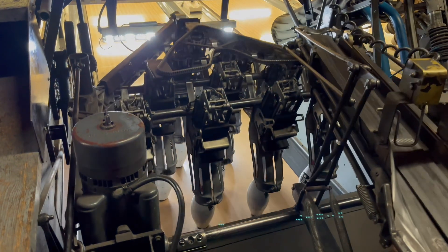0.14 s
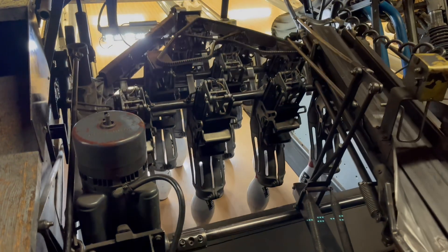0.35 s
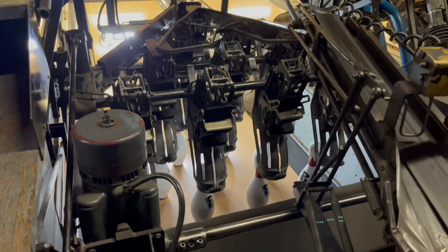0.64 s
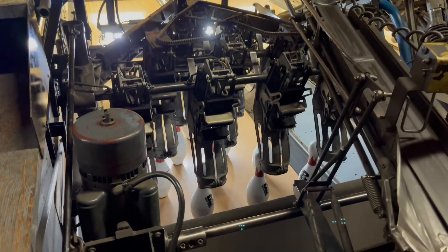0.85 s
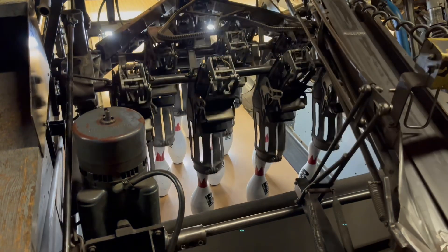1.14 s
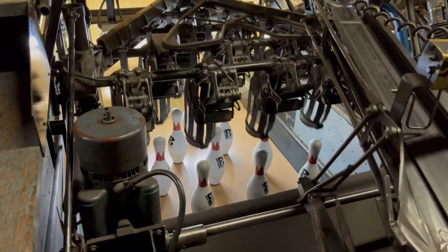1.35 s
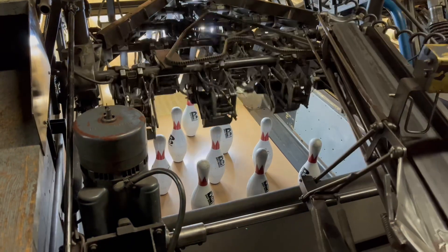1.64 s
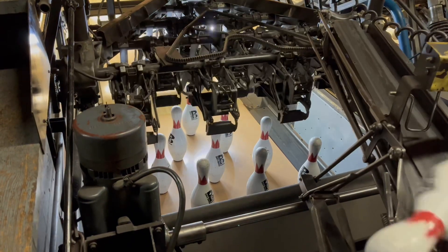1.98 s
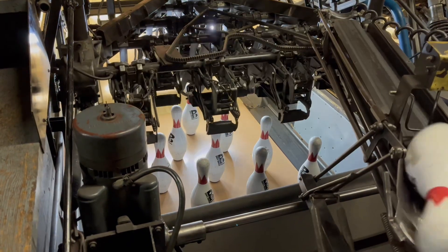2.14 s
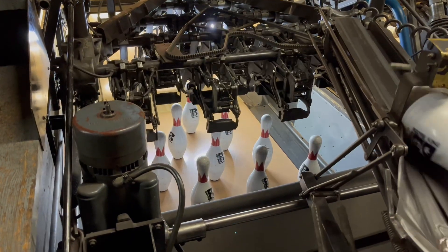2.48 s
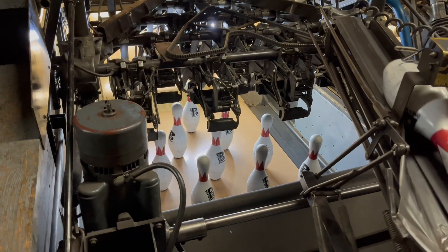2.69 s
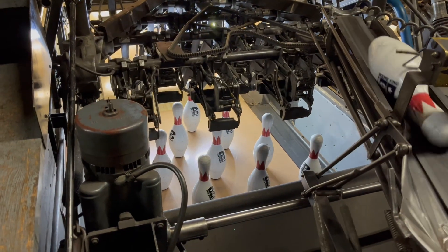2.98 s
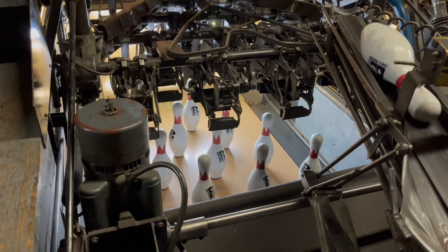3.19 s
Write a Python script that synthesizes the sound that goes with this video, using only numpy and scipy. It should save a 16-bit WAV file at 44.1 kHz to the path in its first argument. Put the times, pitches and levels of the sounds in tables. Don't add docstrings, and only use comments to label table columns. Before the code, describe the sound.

Pinsetter from behind: bright metal clacks first, a quieter whirring stretch, then dense hollow pin knocks, a heavy frame boom and short belt squeaks, heard close in stereo with a short dull room echo.

```python
import sys
import numpy as np
from scipy import signal
from scipy.fft import rfft, irfft, next_fast_len
from scipy.io import wavfile

SR = 44100
rng = np.random.default_rng(int(sys.argv[2]) if len(sys.argv) > 2 else 0)


def output_pcm(signal):
    pcm = np.clip(np.atleast_2d(signal).T, -1, 1) * 32767
    wavfile.write(sys.argv[1], SR, np.round(pcm).astype(np.int16))


def ratio(d):
    e = np.asarray(d, float) / 20
    return 10 ** e


N = 146412


def in_time(rows):
    s, *columns = np.transpose(rows)
    return [np.interp(np.arange(N) / SR, s, c) for c in columns]


def at_hz(points, hz):
    f, v = np.transpose(points)
    return np.interp(np.log(hz + 1), np.log(f + 1), v)


def rms_one(x):
    return x / np.sqrt(np.mean(x ** 2) + 1e-20)


def drift(rate_hz):
    r = np.exp(-80 * np.pi * rate_hz / SR)
    slow = signal.lfilter([1], [1, -2 * r, r * r], rng.standard_normal(N // 40 + 2002))[2000:]
    return np.interp(np.arange(N) / 40, np.arange(len(slow)), rms_one(slow))


def tone(hz):
    return np.sin(2 * np.pi * np.cumsum(hz) / SR)


def swell(s, length_s):
    return np.sin(np.pi * np.clip((np.arange(N) / SR - s) / length_s, 0, 1)) ** 2


def ring(x, hz, t60):
    r, w = ratio(-60 / (t60 * SR)), 2 * np.pi * hz / SR
    return signal.lfilter([0, np.sin(w)], [1, -2 * r * np.cos(w), r * r], x + 1e-18)


def band(x, low_hz, high_hz):
    return signal.sosfilt(signal.butter(2, [low_hz, high_hz], "band", fs=SR, output="sos"), x)


def blows(rows, body, body_db, t60, tail_t60, low_hz, high_hz, damping):
    contact_s, crack_db, crack_t60 = 0.0029, -5, 0.015
    out, shake = np.zeros(N + SR), np.zeros(N + SR)
    t = np.arange(SR // 4) / SR
    spread = rng.normal(0, 1, (50, len(body)))
    for (s, db, hz, rattle_db), chance in zip(rows, spread):
        own = np.sin(2 * np.pi * hz * t) * ratio(-60 * t / t60 * (hz / 1000) ** damping)
        for (f, level_db, decay), c in zip(body, chance):
            mode = np.sin(2 * np.pi * f * (1 + 0.028 * c) * t + c)
            own = own + ratio(body_db + level_db + 2.1 * c) * mode * ratio(-60 * t / decay)
        i = int(s * SR)
        out[i:i + len(t)] += ratio(db + 0.5) * own * (1 - np.exp(-t * hz * 2.3))
        rattle = ratio(db + rattle_db - 1.5 - 60 * t / tail_t60)
        crack = ratio(db + crack_db + 0.5 - 60 * t / crack_t60)
        shake[i:i + len(t)] += (1 - np.exp(-t / contact_s)) * (rattle + crack)
    flutter = ratio(3.96 * drift(104.0))
    loose = rms_one(band(rng.standard_normal(N), low_hz, high_hz))
    return out[:N] + shake[:N] * flutter * loose


# [t/s, peak level/dB, f/Hz, rattle level/dB]
LATCH_STRIKES = [(0.1942, -1, 3920, -17), (0.2187, -3, 3300, -13), (0.3215, -9.5, 1713, -8),
                 (0.3503, -14.5, 2930, -7.5), (1.3763, -6.5, 3545, -13), (1.5924, -15, 4780, 1.5),
                 (1.7404, 0, 4220, -16), (2.0542, -15, 1910, -33), (2.1258, -15.5, 1680, -5),
                 (2.2698, -26.5, 1950, 10.5), (2.4612, -26.5, 1880, 5.5), (2.7685, -42, 1600, -14.5),
                 (3.0306, -35, 2090, 4), (3.1789, -10, 1715, -13.5), (.1855, -23, 4200, -9),
                 (.1945, -18, 2380, -22), (.208, -13, 4800, -9), (.2245, -9, 3260, -19),
                 (.5861, -27.5, 1680, 0.5), (1.1348, -17, 3710, -18), (1.379, -5, 4570, -24),
                 (1.3795, -28, 2360, -19), (1.383, -9, 4730, -21), (1.7425, -11, 4550, -20),
                 (2.6384, -20, 1490, -13), (2.487, -27, 2500, 3), (2.29, -26.5, 2490, 6.5),
                 (.196, -8.5, 4790, -24), (2.77, -23.5, 4270, -3.5), (1.3775, -8, 2990, -16)]
# [f/Hz, level/dB, t60/s]
STEEL_MODES = [(822, -15, 0.068), (1040, -11.5, 0.092), (1345, -12, 0.12), (2436, -7, 0.026),
               (3080, -17.5, 0.051), (4190, -2, 0.012), (4680, -34, 0.072), (6900, -22, 0.01),]


def latches():
    return blows(LATCH_STRIKES, STEEL_MODES, body_db=-7.5, t60=0.06, tail_t60=0.065,
                 low_hz=1300, high_hz=9000, damping=1.0)


# [t/s, peak level/dB, f/Hz, rattle level/dB]
PIN_HITS = [(0.221, -18.5, 984, -0.5), (0.453, -20.5, 444, -2), (0.477, -15, 804, -33),
            (0.498, -12.5, 378, -27), (0.529, -23, 760, -11), (1.237, -27.5, 527, 7.5),
            (1.315, -14.5, 778, -26), (1.377, -13.5, 940, 1), (1.419, -9.5, 790, -15),
            (1.514, -6, 600, -19), (1.561, -6.5, 600, -21), (1.74, -11, 585, -13), (1.758, -10, 484, -22),
            (1.97, -26, 247, 6.5), (2.058, -6, 1040, -2.5), (2.107, -7.5, 287, -5.5),
            (2.129, -4.5, 520, -11), (2.265, -5, 900, -10.5), (2.414, -16, 295, -28), (2.461, 1, 338, -28),
            (2.487, -0.5, 820, -30), (2.532, -14, 290, -43), (2.647, -15, 1100, -4),
            (2.765, -3.5, 345, -13.5), (3.009, -14, 844, -28), (3.177, -10.5, 1070, -2.5),
            (.224, -19.5, 815, -27), (.229, -25.5, 1440, -20), (1.381, -17, 434, -21),
            (1.392, -7, 404, -24), (1.523, -6.5, 750, -25), (1.543, -21, 700, 1), (1.555, -38, 735, -23),
            (1.571, -9.5, 530, -21), (2.12, -8.5, 700, -18), (2.225, -19, 624, -17), (2.535, -17, 800, -8),
            (3.035, -14, 840, -19), (3.1, -14, 810, -11), (2.56, -15.5, 795, -17), (2.6, -14, 690, -15),
            (2.675, -9, 764, -23), (.233, -16, 1030, -20)]
# [f/Hz, level/dB, t60/s]
PIN_MODES = [(265, -4.5, 0.075), (411, -4, 0.062), (543, 5, 0.025), (717, -6.5, 0.082), (835, 11, 0.0067),
             (980, -10, 0.067), (1235, -1.5, 0.017), (1647, -14, 0.0087)]


def pins():
    return blows(PIN_HITS, PIN_MODES, body_db=-6, t60=0.036, tail_t60=0.12,
                 low_hz=234, high_hz=1750, damping=0.067)


# [t/s, peak level/dB, f/Hz]
FRAME_THUDS = [
    (0.209, -21, 114),
    (0.593, -15.5, 134),
    (1.163, -20.5, 125),
    (2.048, -5, 111),
    (2.12, -14, 141),
    (2.26, -15.5, 187),
    (2.802, -19, 68.4),
    (3.032, -11, 71.5),
    (3.139, -7, 123),
    (3.161, -11, 200),
]


def thuds():
    t60, attack_s = 0.12, 0.0029
    out = np.zeros(N)
    for s, db, hz in FRAME_THUDS:
        t = np.arange(N) / SR - s
        since = np.maximum(t, 0)
        onset = 1 - np.exp(-since / attack_s)
        out += ratio(db - 60 * since / t60) * onset * np.sin(2 * np.pi * hz * t)
    return out


# [t/s, peak level/dB, f/Hz, length/s]
ROLLER_WHISTLES = [
    (1.39, -43, 11400, .15),
    (1.335, -45, 9300, .04),
    (1.713, -25, 11500, .025),
    (1.565, -36, 14500, .03),
    (3.02, -43, 11000, .05),
    (.192, -24, 11000, .01),
    (.217, -28, 12000, .012),
    (1.738, -24, 12000, .008),
]


def roller():
    rub = rng.standard_normal(N)
    out = np.zeros(N)
    for s, db, hz, length in ROLLER_WHISTLES:
        whistle = rms_one(band(rub, hz * 0.96, hz * 1.04))
        out += ratio(db) * swell(s, length) * whistle
    return out


# [t/s, f/Hz, level/dB]
BELT_SQUEAL = [
    (2.25, 1130, -50),
    (2.34, 1130, -34),
    (2.55, 1110, -35),
    (2.66, 1075, -33),
    (2.79, 1150, -33),
    (2.9, 1140, -42),
    (3.0, 1150, -32),
    (3.12, 1130, -35),
    (3.3, 1120, -46),
]


def squeal():
    hz, db = in_time(BELT_SQUEAL)
    throb = 1 + 0.6 * tone(48 * (1 + 0.277 * drift(10.5)))
    cry = tone(hz + 12 * drift(19.4))
    started = np.arange(N) > BELT_SQUEAL[0][0] * SR
    return ratio(db + 2.5 * drift(46.0)) * throb * cry * (1 + 0.4 * drift(100.0)) * started


# [t/s, peak level/dB, f/Hz, length/s]
BELT_SLIPS = [(2.59, -19, 1090, .02), (2.64, -15.5, 1065, .028), (2.655, -19, 1215, .035),
              (2.667, -16, 1080, .022), (2.692, -16, 1085, .016), (2.706, -16, 1105, .02),
              (2.75, -14, 1135, .028), (2.784, -13, 1155, .02), (2.808, -15, 1145, .016),
              (2.835, -20, 1150, .028), (1.885, -20, 365, .11)]


def slips():
    t = np.arange(N) / SR
    return sum(ratio(db) * swell(s, length) * np.sin(2 * np.pi * hz * t) for s, db, hz, length in BELT_SLIPS)


# [t/s, clatter level/dB, rumble level/dB]
WORKLOAD = [(0, -30, -43.5), (.3, -30.5, -32), (.5, -28.5, -35), (.7, -29.5, -35.5), (.98, -38, -44),
            (1.2, -29, -40.5), (1.49, -28, -38.5), (1.6, -23.5, -38), (2.0, -24.5, -44), (2.25, -20, -34),
            (2.55, -25, -41.5), (2.85, -22.5, -29), (3.32, -24, -28)]
# [f/Hz, level/dB per Hz]
CLATTER_COLOUR = [(150, -15), (300, -4), (600, -3), (1100, -8), (1600, -11.5), (2500, -20.5), (5000, -31.5),
                  (12000, -58.5)]


def clatter():
    clatter_db, _ = in_time(WORKLOAD)
    grains_per_s, ring_cycles = 400, 16.0
    sizes = ratio(3.5 * np.minimum(rng.exponential(1, N), 3)) * rng.choice([-1, 1], N)
    born = rng.random(N) < grains_per_s * ratio(4.0 * drift(12.0)) / SR
    dealt = rng.integers(0, 16, N)
    rings = np.zeros(N)
    for k, hz in enumerate(np.geomspace(230, 2400, 16)):
        rings += ratio(at_hz(CLATTER_COLOUR, hz)) * ring(sizes * born * (dealt == k), hz, ring_cycles / hz)
    return ratio(clatter_db - 5) * rms_one(rings)


# [f/Hz, peak level/dB, wander/Hz]
MOTOR_HUM = [
    (289.5, -33.5, 2.0),
    (114, -43, 5),
]


def motor():
    return sum(ratio(db + drift(8.0)) * tone(hz + wander * drift(10.0)) for hz, db, wander in MOTOR_HUM)


# [t/s, hiss level/dB]
SLIDING = [(0, -47), (.17, -49), (.26, -34), (.42, -41), (.57, -48.5), (.63, -40), (.86, -50.5),
           (.96, -38.5), (1.06, -43), (1.15, -37.5), (1.33, -41.5), (1.55, -39.5), (1.61, -29.5),
           (1.9, -24.5), (2.04, -33), (2.3, -38.5), (2.4, -50), (3.32, -42)]
# [f/Hz, level/dB per Hz]
HISS_COLOUR = [(600, -12), (1500, 0), (3000, 0), (4500, 0), (6000, -3), (8500, -6), (11500, -8),
               (15500, -12)]
# [f/Hz, level/dB per Hz]
RUMBLE_COLOUR = [(28, -36), (40, -46), (65, 6.5), (115, 5), (200, 4), (400, -44)]


def machine_noise():
    clatter_db, rumble_db = in_time(WORKLOAD)
    slide_db = in_time(SLIDING)[0]
    out, together = 0, drift(6.0)
    edges = 20 * 2 ** np.arange(0, 10.1, .5)
    white = rng.standard_normal((2, 2, N))
    for k, (low, high) in enumerate(zip(edges, edges[1:])):
        hz, own = np.sqrt(low * high), drift(7.5)
        bed = clatter_db - 25.5 + at_hz(CLATTER_COLOUR, hz) + 1.9 * own + 0.46 * together
        rumble = rumble_db - 24 + at_hz(RUMBLE_COLOUR, hz) - 20 * (hz > 600) + 1.5 * own
        brighten = 0.2 * (slide_db - slide_db.max()) * max(np.log2(hz / 5000), 0)
        hiss = slide_db - 32 + brighten + at_hz(HISS_COLOUR, hz) - 20 * (hz < 400)
        hiss = hiss + 1.2 * own + .8 * together
        power = ratio(2 * bed) + ratio(2 * rumble) + ratio(2 * hiss)
        out = out + np.sqrt(power * SR / 2) * band(white[k % 2], low, high)
    return out


def echoes(x, t60):
    t = np.arange(SR) / SR
    wall_cut_hz = 5400
    dull = signal.lfilter([1], [1, -np.exp(-2 * np.pi * wall_cut_hz / SR)], rng.standard_normal(SR))
    tail = dull * ratio(-60 * t / t60) * (t > .002)
    return signal.fftconvolve(x, tail / np.sqrt(np.sum(tail ** 2)))[:N]


# [f/Hz, share]
PORT_LIKENESS = [(60, .99), (250, .88), (500, .8), (1000, .4), (2500, .5), (6000, .55), (7500, .85)]
# [f/Hz, level/dB]
PORT_BALANCE = [(40, .3), (125, 1.5), (1000, 1.6), (4000, 3.2), (7500, 0)]
# [f/Hz, phase/rad]
PORT_PHASE = [(0, 0), (860, .5), (1550, -2.5), (1810, -5.7), (4820, -5.5), (6550, -7.1), (7650, -9.42),
              (8900, -9.42), (11100, -12.57), (13000, -12.57), (14300, -15.7)]


def microphone_ports(parts):
    size = next_fast_len(N + 4096)
    hz = np.arange(size // 2 + 1) * SR / size
    direct, diffuse = rfft(parts, size)
    alike, side = at_hz(PORT_LIKENESS, hz), np.array([[1], [-1]])
    level = ratio(side * at_hz(PORT_BALANCE, hz) / 2)
    phase = np.exp(.5j * side * np.interp(hz, *np.transpose(PORT_PHASE)))
    mix = np.sqrt((1 + alike) / 2) * direct + side * np.sqrt((1 - alike) / 2) * diffuse
    return irfft(level * phase * mix, size)[:, :N]


def scene():
    hits = latches() + pins() + thuds() + roller() + squeal() + slips()
    hits = hits + clatter() + motor()
    direct = hits + ratio(-9) * echoes(hits, t60=0.26)
    diffuse = echoes(hits, t60=0.025)
    return microphone_ports(np.array([direct, diffuse]) + machine_noise())


def low_pass(x):
    return signal.sosfilt(signal.butter(12, 15830, fs=SR, output="sos"), x)


def record(dry):
    cut = signal.sosfilt(signal.butter(3, 48.4, "high", fs=SR, output="sos"), dry)
    return low_pass(0.92 * np.tanh(cut / 1.299))


dry = scene()
out = record(dry)
output_pcm(out)
```